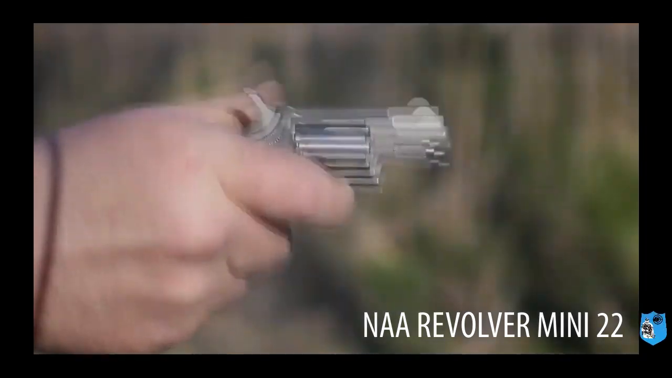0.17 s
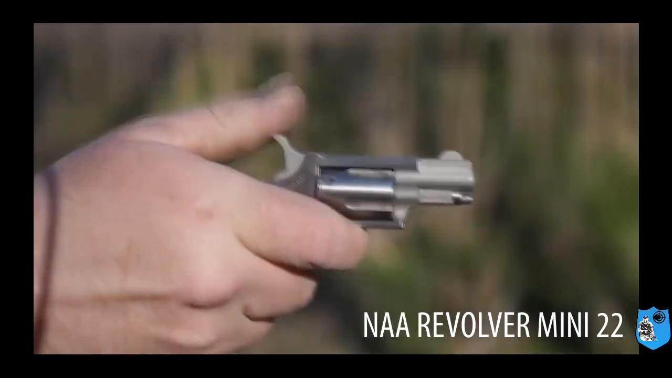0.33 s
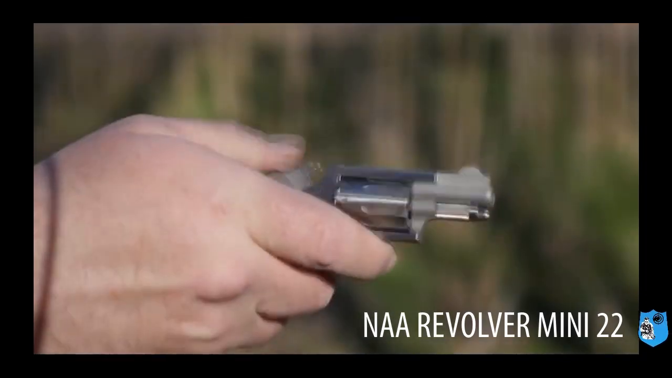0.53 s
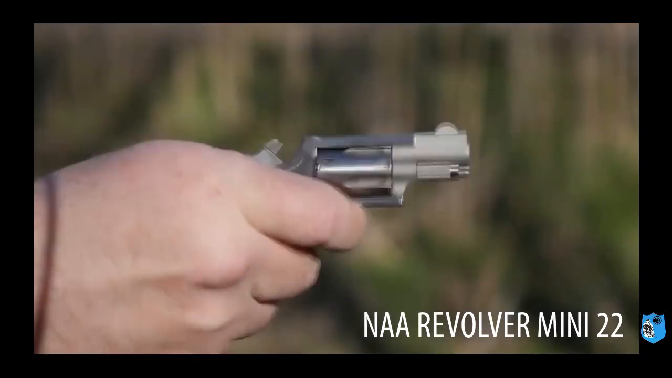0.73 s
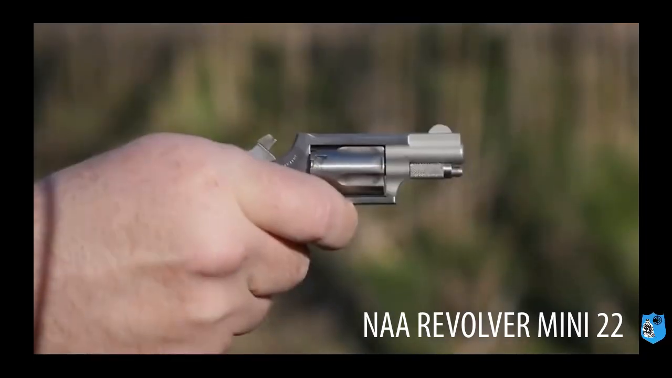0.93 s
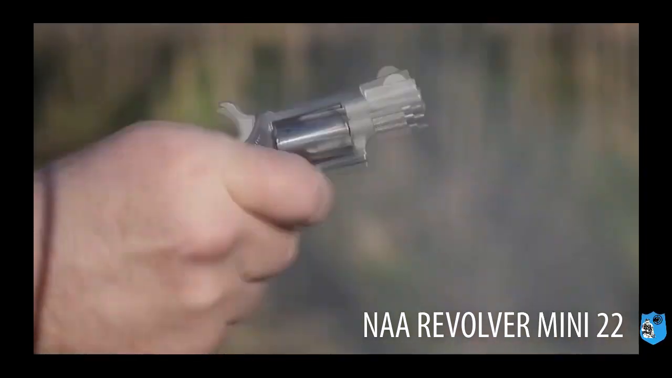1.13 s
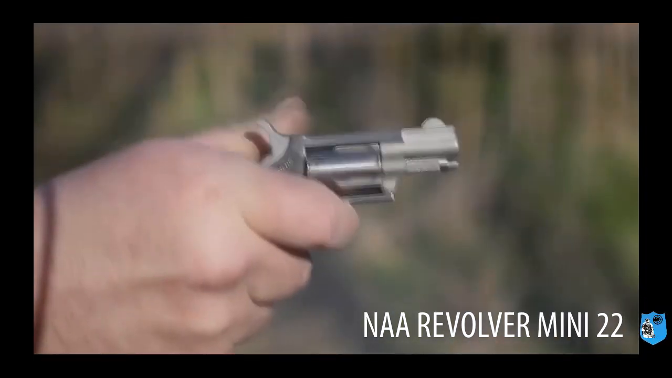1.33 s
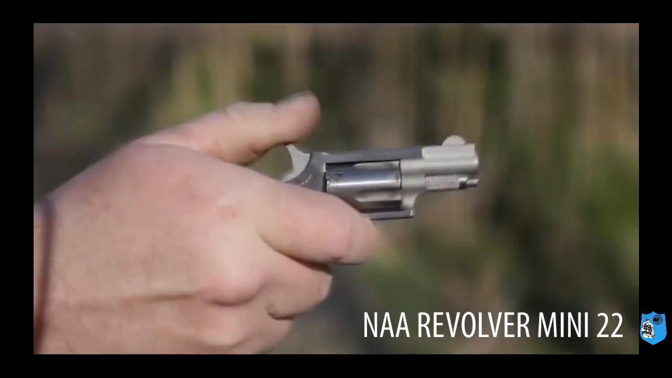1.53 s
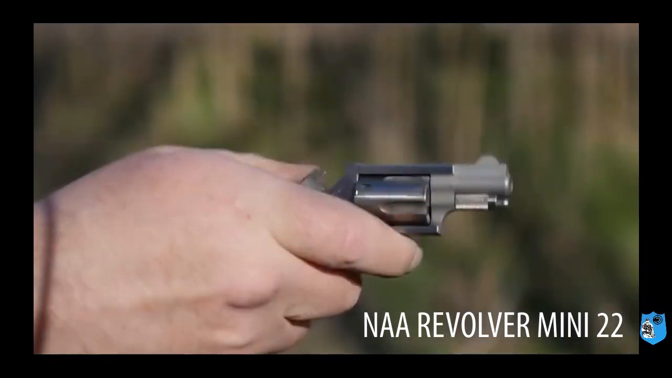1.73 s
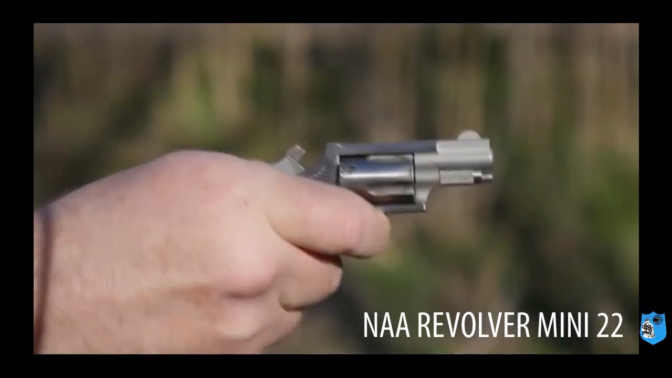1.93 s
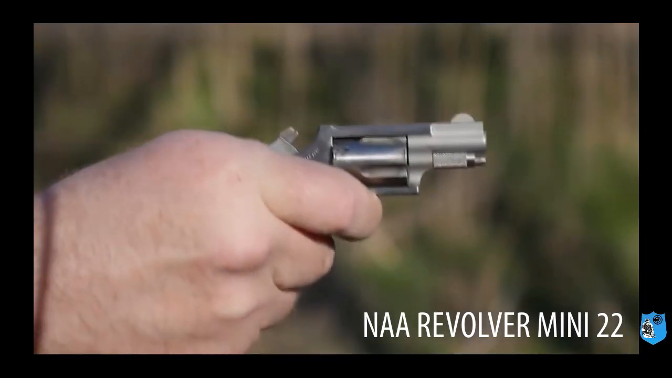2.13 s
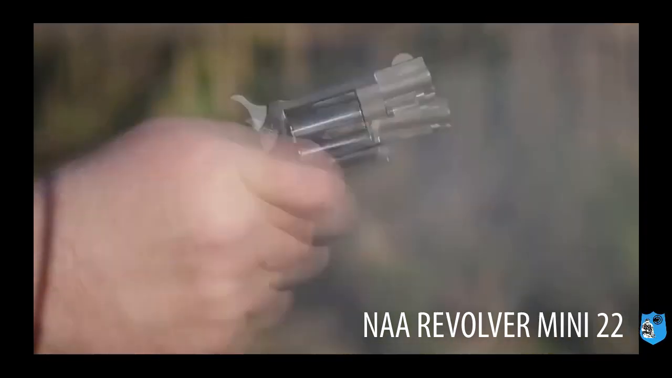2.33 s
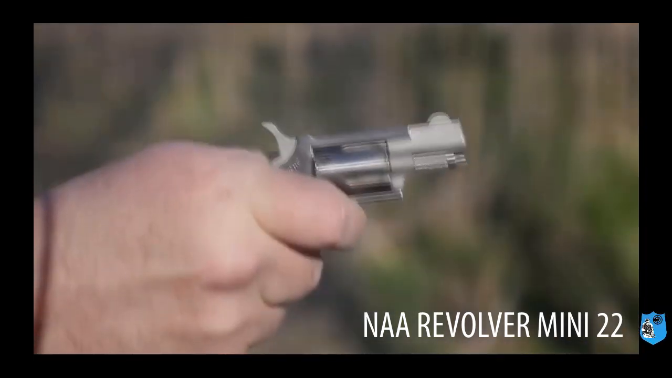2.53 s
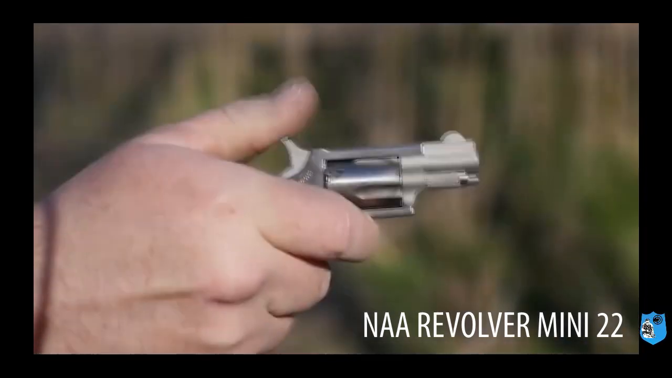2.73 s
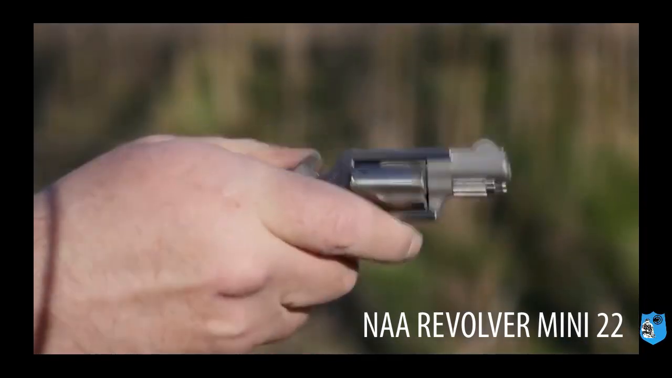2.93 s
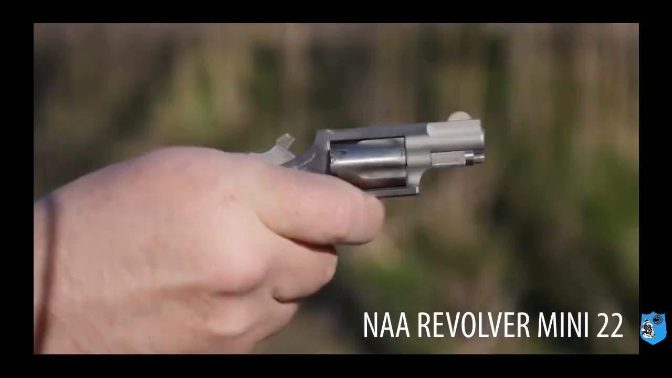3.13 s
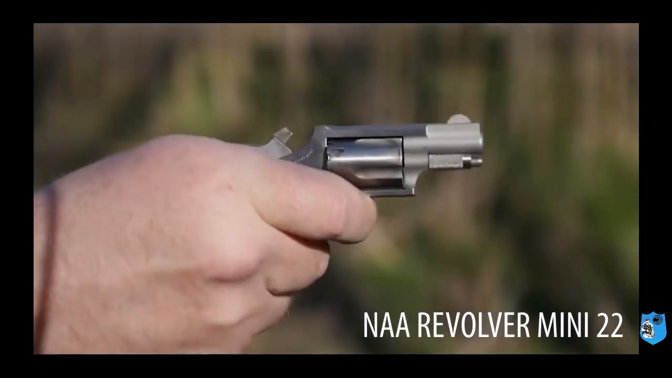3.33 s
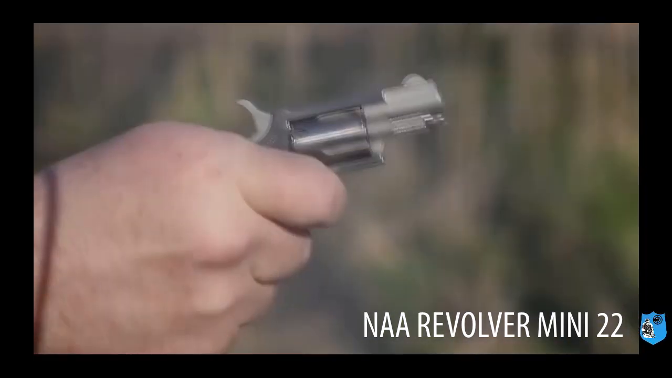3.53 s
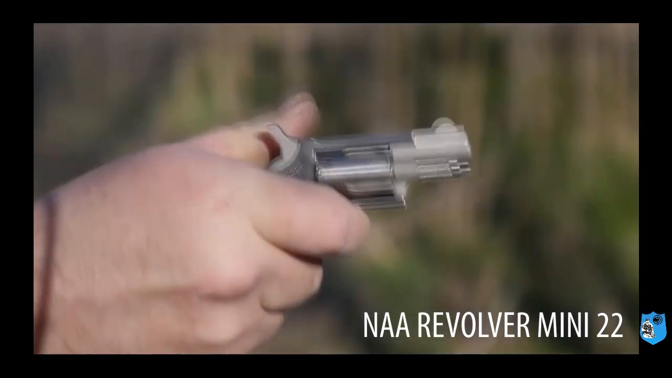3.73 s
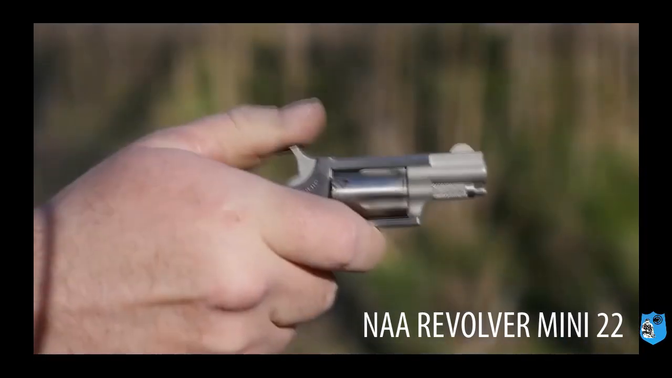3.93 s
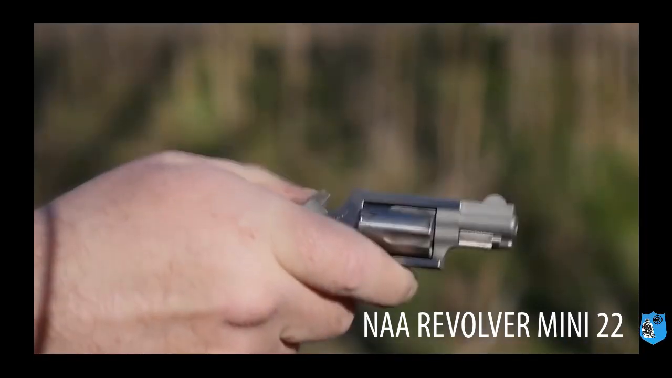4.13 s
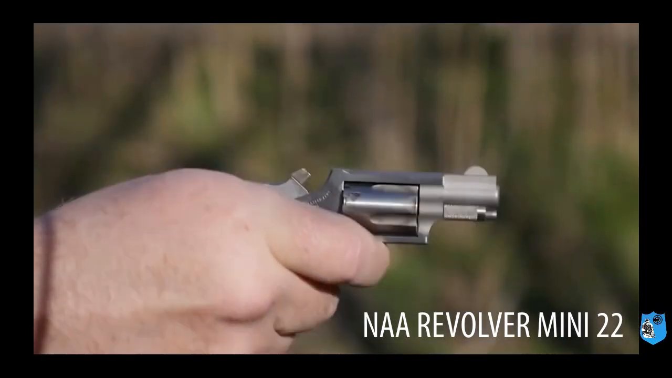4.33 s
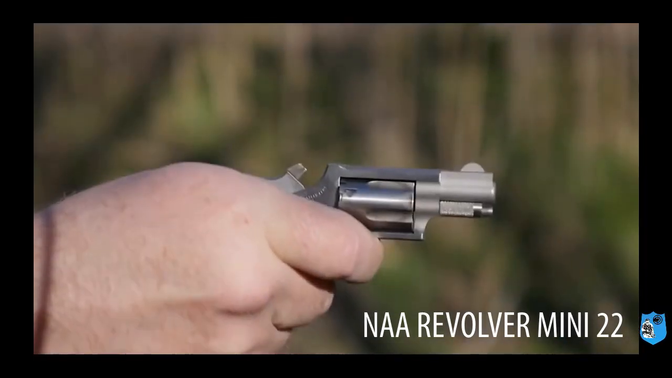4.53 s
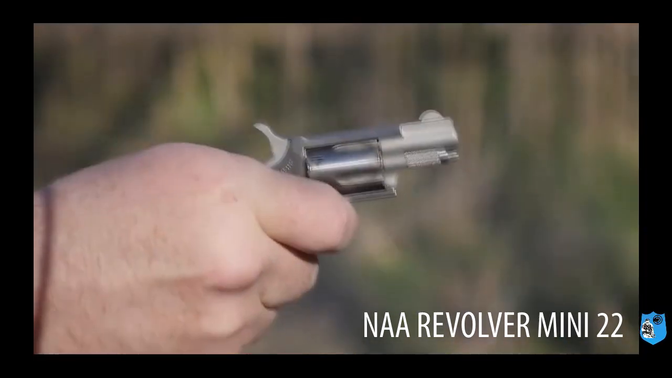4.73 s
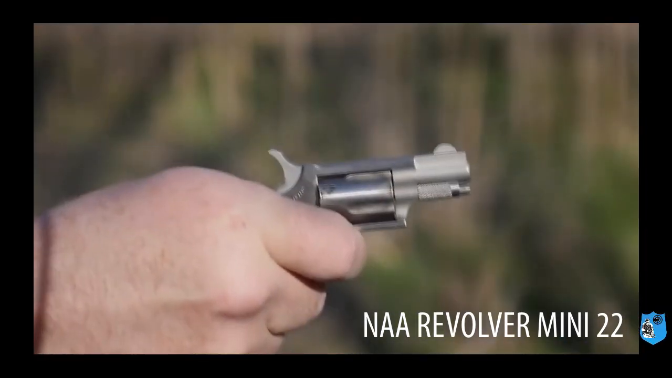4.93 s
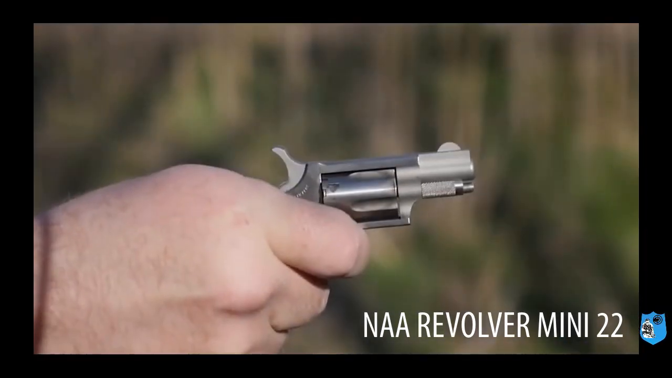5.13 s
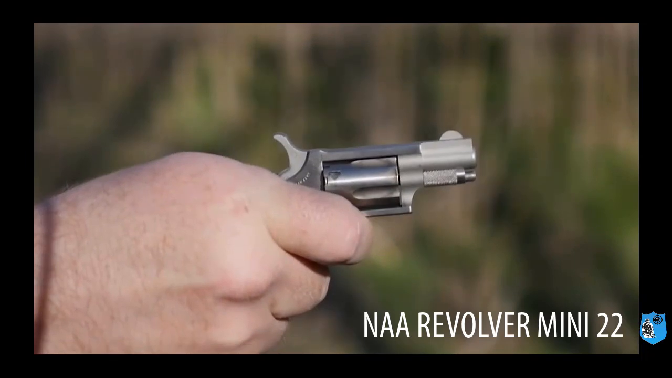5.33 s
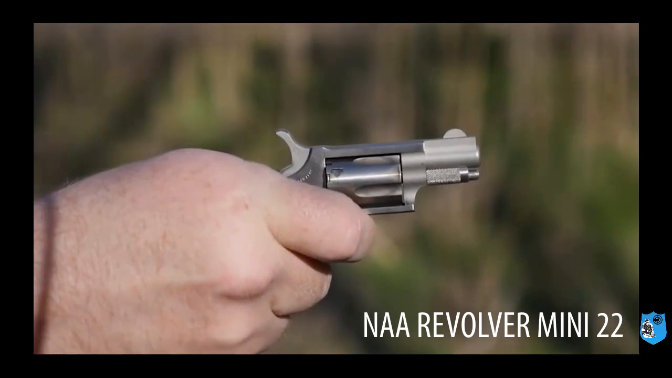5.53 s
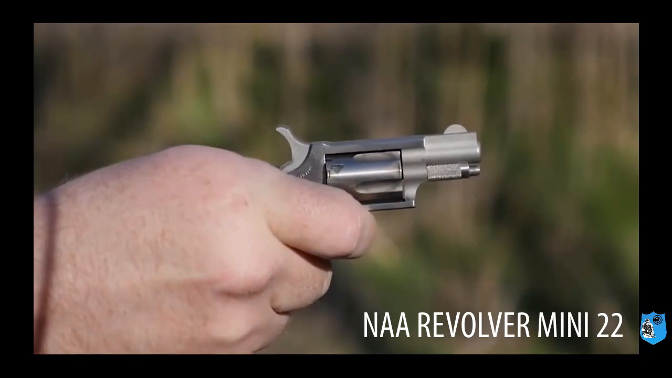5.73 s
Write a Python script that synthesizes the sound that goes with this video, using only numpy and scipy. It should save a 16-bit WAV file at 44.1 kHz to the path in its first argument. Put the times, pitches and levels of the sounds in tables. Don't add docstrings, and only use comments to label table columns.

```python
import sys
import numpy as np
from scipy import signal
from scipy.fft import rfft, irfft, next_fast_len
from scipy.io import wavfile
from scipy.ndimage import uniform_filter1d

SR = 44100
rng = np.random.default_rng(int(sys.argv[2]) if len(sys.argv) > 2 else 0)


def voltage_ratio(level):
    return 10 ** (np.asarray(level, float) / 20)


def to_wav(sig):
    pcm = np.clip(np.atleast_2d(sig), -1, 1) * 32767
    pcm = np.round(pcm).astype(np.int16)
    wavfile.write(sys.argv[1], SR, pcm.T)


N = 254718


def unit(x):
    return x / np.sqrt(np.mean(x ** 2))


def add(out, start_s, sound):
    i = int(round(start_s * SR))
    part = sound[:, max(-i, 0):N - i]
    out[:, max(i, 0):max(i, 0) + part.shape[1]] += part


def stereo(mid, side):
    return np.array([mid + side, mid - side])


def tint(x, points):
    hz, db = np.transpose(points)
    size = x.shape[-1]
    log_hz = np.log(np.fft.rfftfreq(size, 1 / SR) + 1)
    return irfft(rfft(x) * voltage_ratio(np.interp(log_hz, np.log(hz), db)), size)


def coloured(points, side_db):
    noise = rng.standard_normal((2, next_fast_len(N, True)))
    mid, side = tint(noise, points)[:, :N]
    return unit(stereo(mid, voltage_ratio(side_db) * side))


# (frequency [Hz], density [dB per Hz])
QUIET_COLOUR = [(15, -27.5), (25, -5.5), (87, -1), (170, -2.5), (363, -4.5), (405, -3), (863, -9),
                (1370, -29.5), (2480, -39), (5880, -35.5), (7920, -37), (14400, -29), (16000, -34)]
QUIET_DB = -51.5
# (centre [Hz], width [Hz], level [dB])
INSECTS = [
    (7870, 460, -83),
    (6950, 270, -93),
    (14900, 500., -99),
]


def quiet():
    out = voltage_ratio(QUIET_DB - 6.5) * coloured(QUIET_COLOUR, -7.5)
    for hz, width_hz, db in INSECTS:
        waver_db = 3.5 * unit(uniform_filter1d(rng.standard_normal(N), size=9000))
        band = [(hz - width_hz, -50), (hz - width_hz / 2, 0), (hz + width_hz / 2, 0), (hz + width_hz, -50)]
        out += voltage_ratio(db + waver_db) * coloured(band, -10.0)
    return out


# (time [s], peak [dB], frequency [Hz])
THUDS = [
    (0.653, -51, 108),
    (1.602, -54, 71),
    (1.77, -54, 68.1),
    (2.80, -52, 61.4),
    (3.011, -48.5, 133),
    (3.902, -54, 81.6),
    (4.178, -55, 110.),
]


def thuds():
    t = np.arange(N) / SR
    out = np.zeros(N)
    for s, db, hz in THUDS:
        out += voltage_ratio(db) * np.sin(2 * np.pi * hz * (t - s)) * np.exp(-((t - s) / .0095) ** 2)
    return out


# (start [s], end [s], level [dB])
RUSTLE = [
    (.3, 1.204, -61),
    (1.77, 1.907, -63.5),
    (2.98, 3.122, -63.5),
    (4.2, 4.299, -63),
]
# (frequency [Hz], density [dB per Hz])
RUSTLE_COLOUR = [(1470, -12.5), (2100, -2.5), (2740, 3), (4080, 3.5), (5970, 2.5), (13900, 3.5), (15300, 7),
                 (16000, -2.5)]
RUSTLE_RISE_DB_PER_S, RUSTLE_FALL_DB_PER_S = 149, 87.5


def rustle():
    t = np.arange(N) / SR
    levels_db = []
    for start, end, db in RUSTLE:
        rise_db = RUSTLE_RISE_DB_PER_S * np.clip(start - t, 0, None)
        fall_db = RUSTLE_FALL_DB_PER_S * np.clip(t - end, 0, None)
        levels_db.append(db - rise_db - fall_db)
    hiss = coloured([(1200, -28.5)] + list(RUSTLE_COLOUR), -13.5)
    return voltage_ratio(np.max(levels_db, axis=0) + 1.0) * hiss


SPRING_HZ, SPRING_T60_S = 3550, .036
CLICK_LEAD_S = .002


def click(colour, rattle_s, spring_db):
    t = np.clip(np.arange(3000) / SR - CLICK_LEAD_S, 0, None)
    noise = rng.standard_normal((2, len(t)))
    noise = noise * np.abs(noise) ** .15
    rattle = (t / rattle_s) * np.exp(-(t / rattle_s) ** 2) + .17 * (t > 0) * np.exp(-t / .0026)
    ground = voltage_ratio(-30.0) * np.exp(-((t - .0075) / .002) ** 2)
    mid, side = tint(noise * (rattle + ground), [(900, -42.5)] + list(colour))
    spring = voltage_ratio(spring_db) * (t > 0) * np.sin(2 * np.pi * SPRING_HZ * t) * 1000. ** (-t / SPRING_T60_S)
    return stereo(mid, voltage_ratio(-10.5) * side) / np.abs(mid).max() + spring


# (time [s], peak [dB])
HALF_COCK = [
    (0.606, -11.5),
    (1.728, -14),
    (2.9707, -11.5),
    (4.137, -15.5),
]
FULL_COCK = [
    (0.6516, -12.5),
    (1.7739, -14),
    (3.018, -11),
    (4.1804, -11),
]
SETTLE = [
    (0.7313, -19),
    (1.8856, -27),
    (4.3038, -26.5),
]
# (frequency [Hz], density [dB per Hz])
HALF_COLOUR = [(1000, -40.5), (1700, 1.5), (2410, 1.5), (3440, -11), (5390, -7.5), (8380, -9),
               (10200, -3.5), (13100, -7.5), (16000, -17.5)]
BOLT_COLOUR = [(1760, -40.5), (3000, -3), (6530, -11.5), (8820, -5.5), (9660, -13), (12100, 0.5),
               (16000, -7.5)]
FULL_COLOUR = [(1000, -42), (1700, -9.5), (2820, 0), (3740, -8), (5650, -7), (6260, -14), (13300, -6.5),
               (15100, -13.5), (16000, -20)]
SETTLE_COLOUR = [(1060, -43), (1800, 2), (2950, 0.5), (4020, -14.5), (6470, -21), (8280, -9.5), (9250, -19),
                 (12700, 1), (16000, -26)]
BOLT_LEAD_S, BOLT_UNDER_HALF_DB = .0155, -14


def cocking():
    sound = np.zeros((2, N))
    bolt = []
    for (_, half_db), (full_s, _) in zip(HALF_COCK, FULL_COCK):
        bolt.append((full_s - BOLT_LEAD_S, half_db + BOLT_UNDER_HALF_DB))
    # (stops, colour, rattle [s], spring [dB])
    parts = ((HALF_COCK, HALF_COLOUR, .0007, -45.),
             (bolt, BOLT_COLOUR, .0008, -45.),
             (FULL_COCK, FULL_COLOUR, .0013, -40.),
             (SETTLE, SETTLE_COLOUR, .001, -18.))
    for stops, colour, rattle_s, spring_db in parts:
        for s, db in stops:
            add(sound, s - CLICK_LEAD_S, voltage_ratio(db) * click(colour, rattle_s, spring_db))
    return sound


GROUND_DB, GROUND_S = -31.5, .016
CLEARING_DB, EDGE_S = -36., .034
WOOD_DB, DEPTH_S, FALL_DB_PER_S = -31, .32, 57.5
HILLS_DB, HILLS_DB_PER_S = -38, 25.5


def depth_db(t):
    before = np.where(t < GROUND_S, GROUND_DB, CLEARING_DB)
    trees = voltage_ratio(WOOD_DB - FALL_DB_PER_S * np.clip(t - DEPTH_S, 0, None))
    hills = voltage_ratio(HILLS_DB - HILLS_DB_PER_S * t)
    late = 20 * np.log10(np.hypot(trees, hills))
    return uniform_filter1d(np.where(t < EDGE_S, before, late), size=150)


SPARSE_DB, BIGGEST_TRUNK = 2.4, 5.


def trunk_paths():
    size = 2 ** 16
    girth = np.minimum(rng.exponential(size=size), BIGGEST_TRUNK)
    return unit(rng.standard_normal((2, size)) * voltage_ratio(SPARSE_DB * girth))


# (delay [s], level over the rest [dB], duration [s])
STANDS = [
    (0.041, 4, 0.0045),
    (0.094, 8.5, 0.0023),
    (0.123, -1.5, .004),
    (0.159, 5.5, 0.015),
    (0.255, 5.5, 0.0045),
    (0.304, 1.5, 0.039),
    (0.355, -6.5, 0.002),
]
# (frequency [Hz], colour [dB], extra loss [dB per s], side over mid [dB])
AIR = [(38.9, -29, 148.5, -13), (122.5, -16.5, 105, -9.5), (257, -28.5, 36, 1), (409.7, -13.5, -22, -10),
       (770, -4, 0.5, -11), (1260, -2, 1, -11), (1332, -2, 3, -9.5), (2040, -7, 17.5, -10),
       (2860, -8, 31.5, -8.5), (4300, -6.5, 81, -4), (7850, -6, 143.5, -4.5), (12590, -7.5, 161, -7),
       (16000, -12.5, 178, 0.5)]
LOSS_KNEE_S, SAME_PATHS = .91, .9


def wood(trunks):
    size = trunks.shape[1]
    t = np.arange(size) / SR
    fresh = rng.standard_normal(trunks.shape)
    paths = rfft(SAME_PATHS * trunks + np.sqrt(1 - SAME_PATHS ** 2) * fresh)
    octave = np.log2(np.fft.rfftfreq(size, 1 / SR) + 1)
    hz, *columns = np.transpose(AIR)
    far_s = t / (1 + t / LOSS_KNEE_S)
    stands_db = sum(db * np.exp(-((t - s) / lasts_s) ** 2) for s, db, lasts_s in STANDS)
    out = 0
    for centre in np.arange(5, 14.1, .5):
        colour_db, loss_db, side_db = (np.interp(centre, np.log2(hz), c) for c in columns)
        bark = np.clip(1 - .3 * abs(centre - 10), .1, 1)
        band = np.cos(np.pi * np.clip(octave - centre, -.5, .5)) ** 2
        mid, side = irfft(paths * band, size)
        level = voltage_ratio(colour_db - loss_db * far_s + bark * stands_db) / mid.std()
        out = out + level * stereo(mid, voltage_ratio(side_db) * side)
    return out * voltage_ratio(depth_db(t))


def gas(lead_s, db):
    t = np.arange(2000) / SR
    colour = [(800, -24.5), (3000, -3.5), (6000, -6.5), (8500, -2.0), (12500, -4.5), (16000, -10.0)]
    mid, side = tint(rng.standard_normal((2, len(t))), colour)
    spit = np.clip(t / .0002, 0, 1) * np.exp(-t / .002)
    flare = (t > lead_s - .0004) * .55 * np.exp(-(t - lead_s) / .0011)
    return voltage_ratio(db + 5.5) * (spit + flare) * stereo(mid, .65 * side)


# (delay [s], left [dB], right [dB])
NEAR = [
    (.0027, -9., -16.),
    (.0040, -22., -22.),
    (.0054, -13., -13.),
    (.0066, -20., -20.),
    (.0080, -7., -7.),
    (.0089, -12., -11.),
    (.0098, -17., -16.),
]
# (start [s], frequency [Hz], level [dB], t60 [s])
SWING = [
    (.006, 76., -11.5, .042),
    (.0085, 150., -19., .03),
    (.021, -40., -26., .12),
]
# (frequency [Hz], level [dB], t60 [s])
BARREL = [
    (1500., -19., .007),
    (1950., -9.5, .01),
    (3000., -18., .007),
    (4400., -16., .006),
]
# (delay [s], frequency [Hz], level [dB], duration [s], left lag [s])
ROWS = [
    (.0361, 1120., -15., .0022, .0001),
    (.099, 1000., -20., .0015, 0.),
    (.131, 900., -22., .002, 0.),
    (.1505, 1000., -14., .0008, 0.),
    (.252, 900., -24., .0015, 0.),
]
BLAST_LEAD_S = .0003


def muzzle():
    t = np.arange(13000) / SR - BLAST_LEAD_S

    def push(s, width_s):
        return np.exp(-((t - s) / width_s) ** 4)

    after = np.clip(t - .0002, 0, None) / .0007
    suction = 1.35 * after * np.exp(-after ** 1.4)
    y = np.tile(.8 * push(0, .00017) - suction, (2, 1))
    for s, left_db, right_db in NEAR:
        s += .00008 * rng.standard_normal()
        y += voltage_ratio([[left_db], [right_db]]) * (push(s, .00022) - .3 * push(s + .00045, .00025))
    for s, hz, db, t60_s in SWING:
        late = np.clip(t - s, 0, None)
        level = voltage_ratio(db + np.array([[.8], [-.8]]))
        y += level * np.sin(2 * np.pi * hz * late) * 1000. ** (-late / t60_s)
    for hz, db, t60_s in BARREL:
        late = np.clip(t - .001 * rng.random(), 0, None)
        shot_hz = hz * (1 + .08 * rng.standard_normal())
        y += voltage_ratio(db) * np.sin(2 * np.pi * shot_hz * late) * 1000. ** (-late / t60_s)
    for s, hz, db, lasts_s, lag_s in ROWS:
        late = t - s - np.array([[lag_s], [0]])
        y -= voltage_ratio(db) * np.cos(2 * np.pi * hz * late) * np.exp(-(late / lasts_s) ** 2)
    return y


DUCK_DB, RECOVER_S = -16.5, .12


def recovery():
    t = np.arange(N) / SR
    return voltage_ratio(sum(DUCK_DB * (t > s) * np.exp(-((t - s) / RECOVER_S) ** 2) for s, *_ in SHOTS))


# (blast time [s], gas lead over blast [s], gas level [dB])
SHOTS = [
    (.00231, .0016, -9.5),
    (1.21544, .0027, -8.5),
    (2.42807, .0016, -9.5),
    (3.55887, .0026, -9.),
    (4.70356, .0036, -9.),
]
EARLIER_SHOT_S = -1.2
HAMMER_FALL_S, HAMMER_DB = .0033, -25.


def shots(out):
    trunks = trunk_paths()
    add(out, EARLIER_SHOT_S, wood(trunks))
    for s, lead_s, gas_db in SHOTS:
        add(out, s - BLAST_LEAD_S, muzzle())
        add(out, s, wood(trunks))
        add(out, s - lead_s, gas(lead_s, gas_db))
        hammer = voltage_ratio(HAMMER_DB) * click(BOLT_COLOUR, .0007, -50)
        add(out, s - lead_s - HAMMER_FALL_S - CLICK_LEAD_S, hammer)


def scene():
    out = quiet() * recovery() + rustle() + thuds()
    shots(out)
    return out + cocking()


def low_pass(x):
    return signal.sosfilt(signal.butter(12, 16820, fs=SR, output="sos"), x)


def record(dry):
    top_hz, rail = 15500, .58
    cut = signal.sosfilt(signal.cheby1(8, .5, top_hz, fs=SR, output="sos"), dry)
    clipped = rail * np.tanh((np.abs(cut) / rail) ** 2.5) ** (1 / 2.5) * np.sign(cut)
    return low_pass(clipped)


dry = scene()
out = record(dry)
to_wav(out)
```